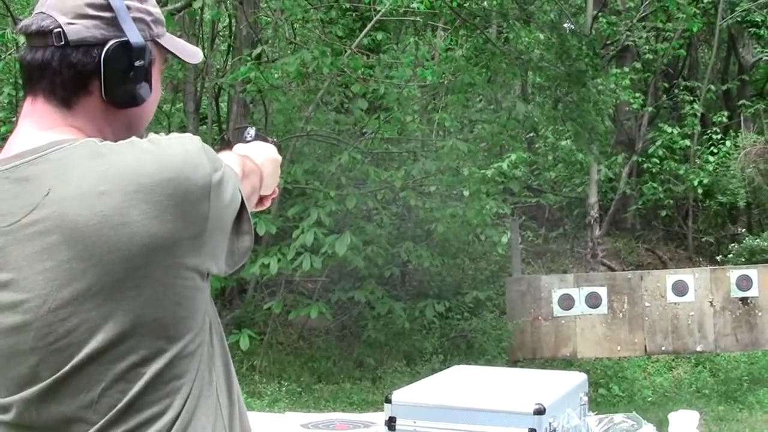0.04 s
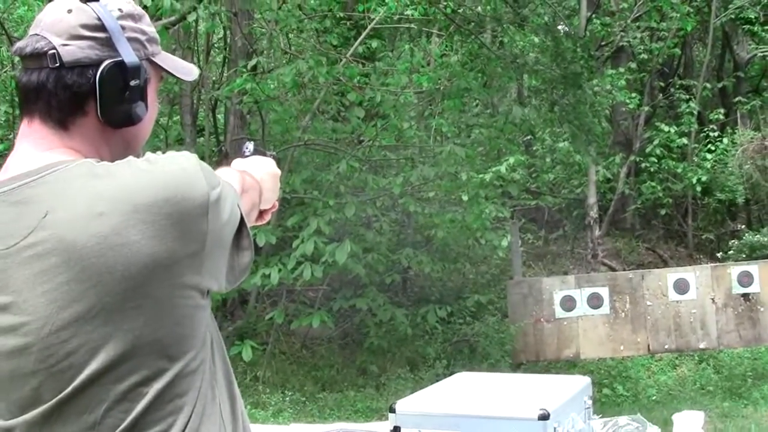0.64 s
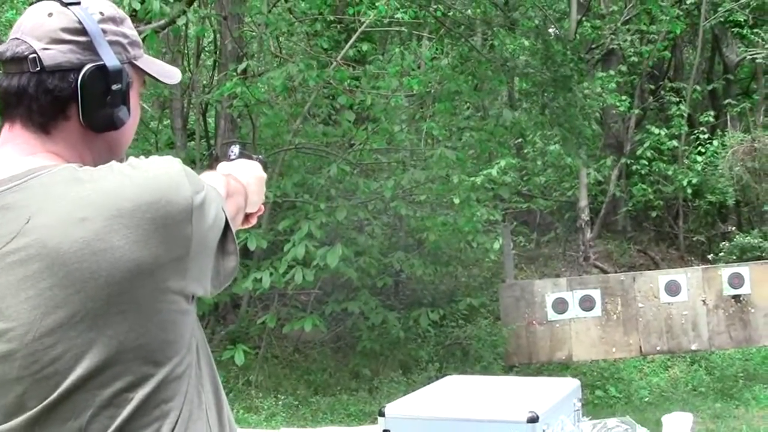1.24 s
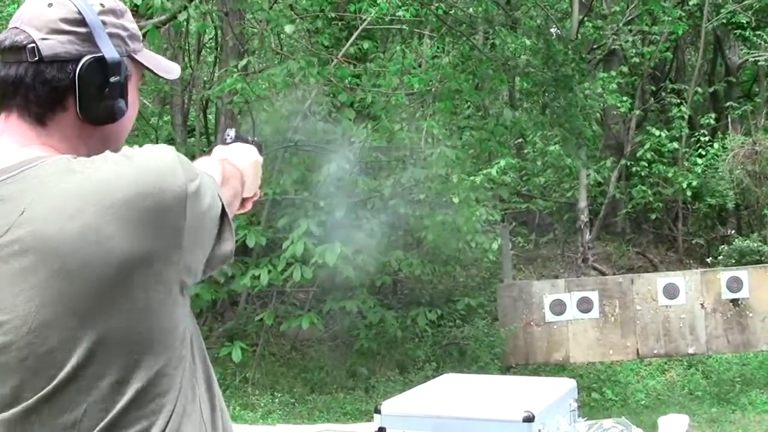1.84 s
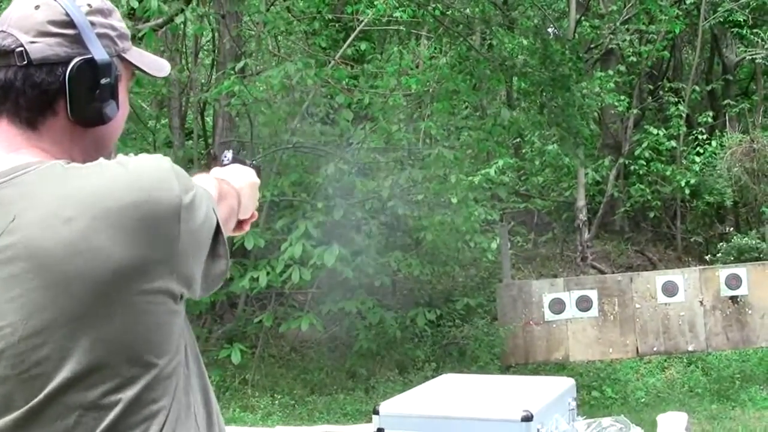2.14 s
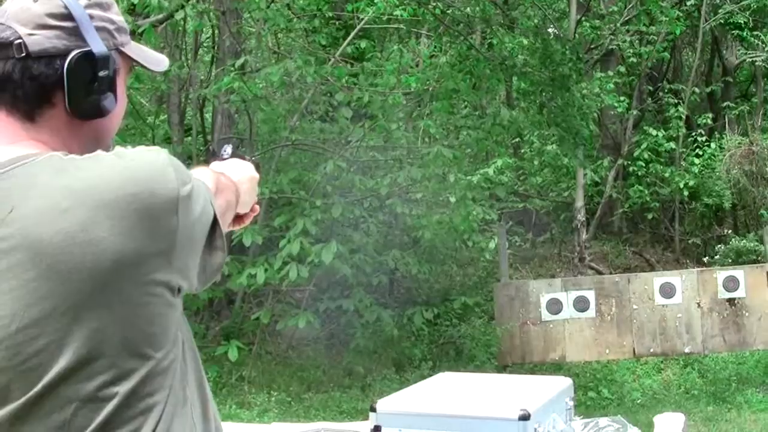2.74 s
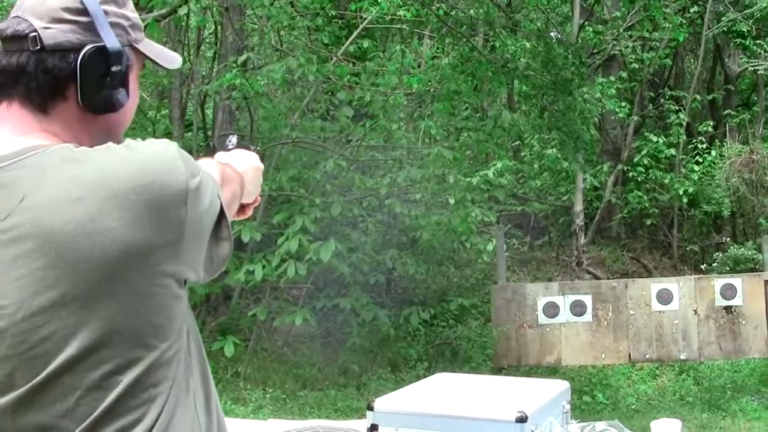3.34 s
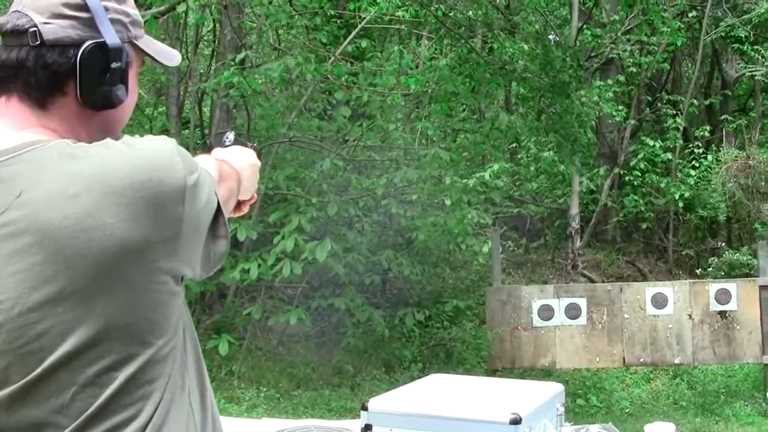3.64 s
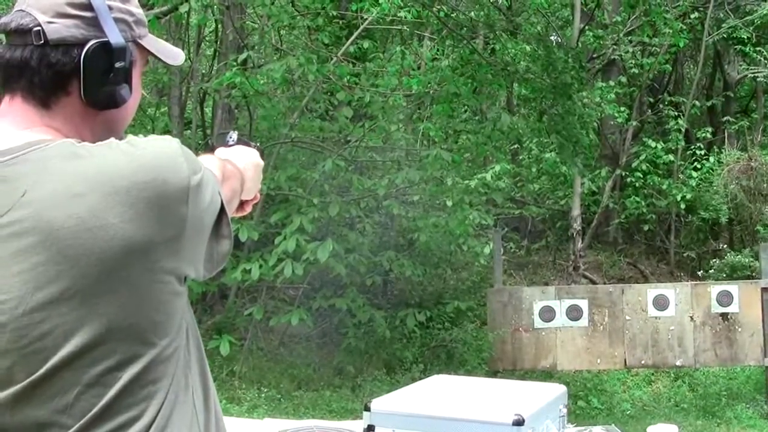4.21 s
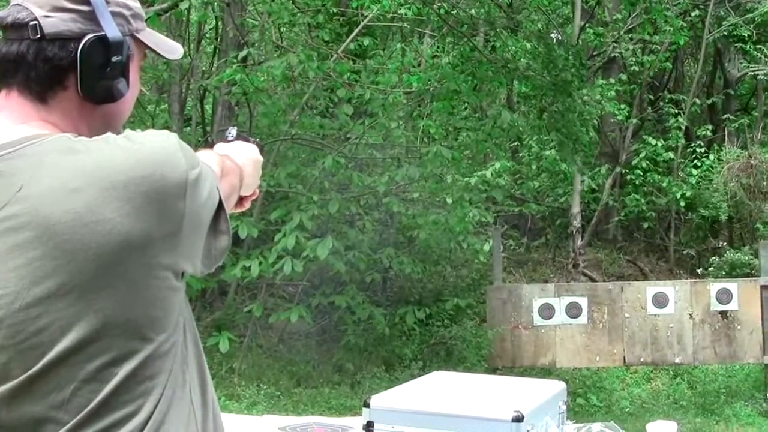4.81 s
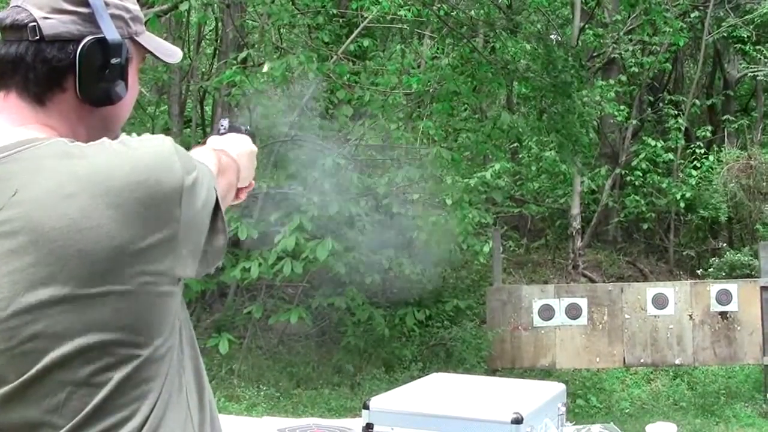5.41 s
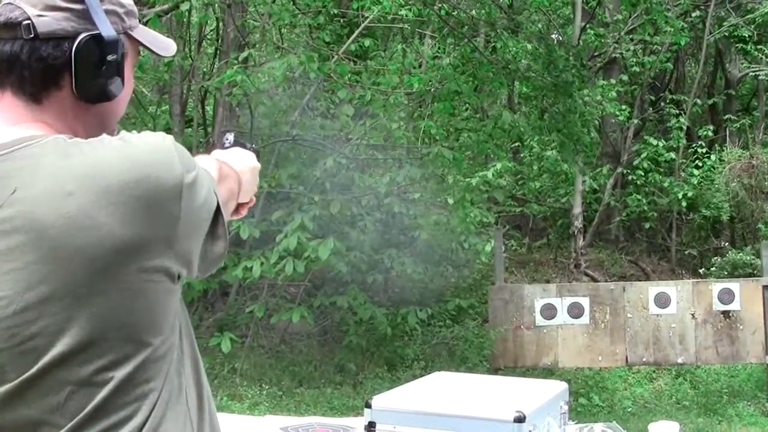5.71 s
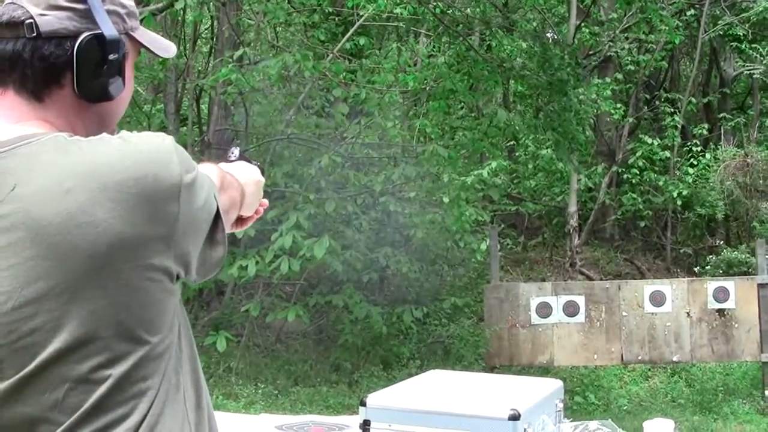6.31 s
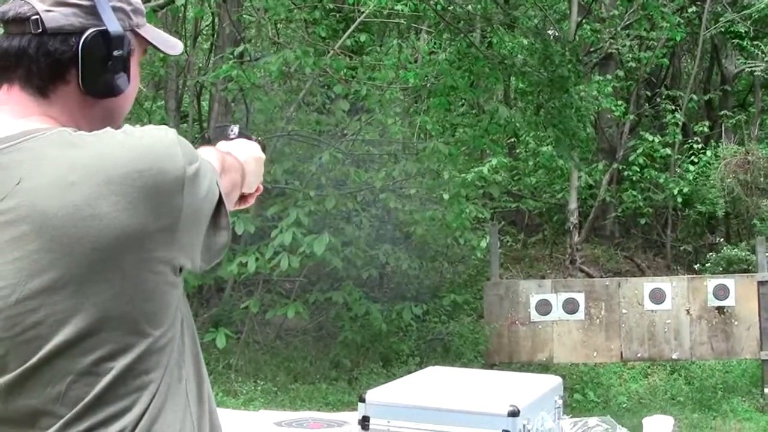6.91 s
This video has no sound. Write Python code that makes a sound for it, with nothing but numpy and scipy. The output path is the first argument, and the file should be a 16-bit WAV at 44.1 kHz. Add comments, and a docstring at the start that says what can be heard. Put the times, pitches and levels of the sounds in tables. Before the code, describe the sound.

A handgun fires twice close by, then another gun farther off, each shot trailing a long forest echo over faint birdsong.

```python
"""At a range in the woods, birds sing and a far engine drones as an earlier shot's echo dies away.
At 1.85 s a handgun fires close by: the blast overloads the microphone, rings the bench and slaps back
from the targets, then the forest returns a long roar that darkens as it travels. The gun clicks in the
hands and the engine swells. A second close shot comes at 5.47 s and a third, from another lane, just
after 6 s. Birds call again over its fading roar."""
import sys
import numpy as np
from scipy import signal
from scipy.fft import rfft, irfft
from scipy.io import wavfile
from scipy.ndimage import uniform_filter1d

SR = 44100
rng = np.random.default_rng(int(sys.argv[2]) if len(sys.argv) > 2 else 0)


def log_audio(samples):
    """Write samples as a 16-bit WAV file to the path given in sys.argv[1]."""
    # one column per channel
    frames = np.atleast_2d(samples).T
    # limit to full scale, then quantise
    limited = np.clip(frames, -1, 1)
    pcm = np.round(limited * 32767).astype(np.int16)
    wavfile.write(sys.argv[1], SR, pcm)


N = 311346
TIME = np.arange(N) / SR

# how much the two channels differ: (frequency [Hz], side compared with middle [dB])
STEREO_WIDTH = [(30, -24), (120, -36), (250, -40), (500, -26), (1000, -16.5), (2000, -12), (4000, -17),
                (12000, -40)]
# tone of the woods' hush: (frequency [Hz], relative level [dB])
AIR_COLOUR = [(18, -57), (30, -27), (64, -13), (107, -1.5), (213, -3.5), (254, 2.5), (311, -3), (544, -4.5),
              (720, -8.5), (1110, -12), (1430, -15.5), (5100, -23), (5510, -25), (10400, -33), (13100, -43)]
# the far engine's loudness, in three stretches that are joined up: (time [s], relative level [dB])
ENGINE_LEVELS = [
    [(0.1, -57.5), (1.496, -68), (1.5, -69)],
    [(2.65, -51), (3.26, -51.5), (3.36, -55), (3.99, -44), (4.22, -45.5), (4.63, -51.5), (5.3, -52),
     (5.35, -56)],
    [(6.4, -48.5), (6.56, -44), (7.0, -43.5)],
]
# tones of the engine, which fires twice a turn: (multiple of the shaft speed, relative level [dB])
ENGINE_TONES = [(2, -4.5), (3, -20.5), (5, -24.5)]

# long clear whistles:
# (time [s], length [s], start pitch [Hz], middle pitch [Hz], end pitch [Hz], level [dB], swell [dB])
BIRD_WHISTLES = [(-.02, 0.11, 4000, 4470, 4610, -49.5, -3), (0.408, 0.33, 2974, 3007, 2670, -48.5, 6),
                 (0.936, .5, 5183, 5240, 5200, -56.5, -8.5), (6.959, 0.093, 3650, 3860, 3970, -50.5, 7)]
# falling chirps, alone or in a fading run: (time [s], run length [s], pitch [Hz], level [dB])
BIRD_CHIRPS = [(.088, .05, 2960, -50.5), (.115, .05, 3420, -51.5), (.905, .58, 3840, -52),
               (3.66, .05, 3270, -63), (6.89, .05, 5080, -49)]
# warbles that swing up and down: (time [s], length [s], pitch [Hz], swing [share of pitch], level [dB])
BIRD_WARBLES = [(.742, .03, 3760, 0.091, -58), (3.46, 0.072, 3574, 0.13, -62),
                (4.561, 0.26, 3250, .17, -58), (6.747, .12, 5340, .06, -54)]
# thin high peeps: (time [s], level [dB])
BIRD_PEEPS = [(.052, -65), (.33, -67), (.5, -67), (.745, -63), (1.07, -62.5), (1.17, -66), (6.772, -60)]

# A fade time (t60) is how long a sound takes to fall by 60 dB.
# the gun shifting in the hands; short ones click, long ones rub: (time [s], level [dB], fade time [s])
GUN_CLICKS = [(2.6, -55, 0.91), (3.404, -42, 0.021), (3.415, -45.5, .06), (3.66, -57, .15),
              (3.695, -56, 0.14), (3.885, -55.5, 0.121), (6.69, -52, .15), (6.72, -50.5, 0.2)]
# tone of scraping steel: (frequency [Hz], relative level [dB])
STEEL_COLOUR = [(1500, -8), (3300, 4), (4200, -2), (4800, 2), (6000, -3), (9000, -10), (10700, -8),
                (13000, -24)]

# tone of the sound scattered by the trees: (frequency [Hz], relative level for this lane [dB],
# relative level for the other lane [dB], how fast each band of the roar fades [dB/s])
FOREST_COLOUR = [(40.15, -42.5, -40, 8.5), (110, -30, -25, 3), (199.6, -17.5, -14, 3), (324, -9, -16, 2),
                 (479.5, -1.5, -8, 1), (712, 2.5, 0.5, 2), (1060, -2, -1, 3.5), (1460, -8.5, -2, 6.5),
                 (2030, -6.5, -5, 12.5), (3200, -10, -9, 19), (4300, -11.5, -11, 27),
                 (5627, -14.5, -17, 36), (7600, -16, -19.5, 48.5), (9460, -18.5, -26, 68),
                 (11500, -24, -34.5, 92.5), (13000, -32.5, -56.5, 152)]
# the woods' answer to each lane builds, holds while the blast crosses the nearest trees, then thins:
# (full level [dB], starts lower by [dB], build time [s], held until [s], fall per doubling of time [dB])
ROAR_SHAPES = [(-12, 15, .095, 0.47, 9.5), (-15, 6.5, 0.016, 0.18, 5.5)]
THIS_LANE, OTHER_LANE = 0, 1
# echoes from the target boards, then from banks farther off:
# (delay [s], relative level [dB], fade time [s], dull above [Hz])
SLAP_ECHOES = [(0.0424, -13.5, 0.051, 1700), (0.0571, -7.5, 0.024, 4200), (.058, -18, 0.046, 241),
               (.074, -13, 0.03, 1300), (0.197, -20, 0.041, 354), (0.274, -20, 0.046, 690),
               (.36, -24.5, 0.07, 600), (0.439, -24, 0.05, 416), (.772, -26, 0.07, 263)]
# the notes the bench rings with: (pitch [Hz], relative level [dB], fade time [s])
BENCH_NOTES = [(248, 0, 0.051), (454, -1.5, 0.094), (574, -6, 0.024), (720, -4.5, .035), (995, -9, 0.058),
               (1159, 0.5, 0.045), (1394, -3, 0.066), (1510, -15, 0.064), (1830, -18, .06),
               (2260, -17.5, 0.09), (3100, -16.5, 0.05)]
# the bang from the other lane: (frequency [Hz], relative level [dB], fade time [s])
FAR_BLAST = [(40, -26.5, .1), (120, -10, 0.054), (230, 7.5, 0.068), (603, 2.5, 0.059), (1210, 1, 0.14),
             (2170, -3.5, 0.16), (4000, -12, .1), (12000, -62, .1)]
# the bang at the close gun's muzzle: (frequency [Hz], relative level [dB], fade time [s])
NEAR_BLAST = [(30, -21.5, .1), (88.9, -18, 0.027), (217, -2.5, 0.075), (701.3, -7, 0.042),
              (1473, -2.5, 0.0194), (3004, -3.5, 0.017), (5000, -6.5, .012), (9000, -4.5, 0.007),
              (13000, -12.5, .008)]
# shots beside the microphone: (time [s], gain [dB])
NEAR_SHOTS = [(1.8506, 1), (5.4707, 1)]


def gain_of(db):
    """Turns decibels into a number to multiply a sound by."""
    return 10 ** (np.asarray(db) / 20)


def evened(x):
    """Scales a sound to an average strength (rms) of one."""
    return x / np.sqrt(np.mean(x ** 2) + 1e-20)


def read(points, hz):
    """Reads between (Hz, value) points, giving every octave equal room."""
    known_hz, value = np.transpose(points)
    return np.interp(np.log(hz + 1), np.log(known_hz + 1), value)


def add(mix, s, sound):
    """Mixes a sound in at s seconds; whatever falls outside is dropped."""
    start = round(s * SR)
    part, sound = mix[..., max(start, 0):], sound[..., max(-start, 0):]
    n = min(part.shape[-1], sound.shape[-1])
    part[..., :n] += sound[..., :n]


def coloured(x, spectrum):
    """Shapes a sound's tone with a curve of (Hz, dB) points."""
    n = x.shape[-1]
    return irfft(rfft(x) * gain_of(read(spectrum, np.fft.rfftfreq(n, 1 / SR))), n)


def filtered(x, kind, hz, order=2):
    """Keeps what lies above a frequency (highpass) or between two (bandpass)."""
    return signal.sosfilt(signal.butter(order, hz, kind, fs=SR, output="sos"), x)


def stereo(mid, side):
    """Left and right sound nearly the same, with the bass in the centre."""
    side = coloured(side, STEREO_WIDTH)
    return np.array([mid + side, mid - side])


def fading(x, loss, bands=26):
    """Splits a sound into overlapping bands that each die at their own rate (Hz, dB/s)."""
    n = x.shape[-1]
    t, hz, spectrum = np.arange(n) / SR, np.fft.rfftfreq(n, 1 / SR), rfft(x)
    centres = np.geomspace(50, 14000, bands)
    shares = [read(np.c_[centres, one], hz) for one in np.eye(bands)]
    return sum(irfft(spectrum * share, n) * gain_of(-read(loss, centre) * t)
               for centre, share in zip(centres, shares))


def wobble(n, size):
    """A smooth random drift that changes over about size samples."""
    return evened(uniform_filter1d(rng.standard_normal(n), size))


def progress(length):
    """Runs from 0 to 1 in length seconds."""
    return np.linspace(0, 1, round(length * SR))


def air(level_db=-53.5, spread_db=4):
    """The steady hush of the woods, coming from all sides."""
    mid, side = evened(coloured(rng.standard_normal((2, N)), AIR_COLOUR))
    return gain_of(level_db) * stereo(mid, gain_of(spread_db) * side)


def engine(shaft_hz=58.95, waver=0.0035, boost_db=1.0):
    """A far engine hums at multiples of its shaft speed, swelling and fading."""
    turns = np.cumsum(shaft_hz * (1 + waver * wobble(N, size=9000))) / SR
    hum = sum(gain_of(db) * np.sin(2 * np.pi * round(k) * turns) for k, db in ENGINE_TONES)
    level_db = boost_db + np.interp(TIME, *np.vstack(ENGINE_LEVELS).T)
    return gain_of(level_db) * evened(hum)


def bird_note(hz, waver, swell_db=0, flutter_db=2):
    """A pure tone wavers and flutters as it follows a pitch curve."""
    n = len(hz)
    level_db = flutter_db * wobble(n, size=500) + swell_db * np.linspace(0, 1, n)
    loudness = evened(gain_of(level_db) * signal.windows.tukey(n, .3))
    pitch = hz * (1 + waver * wobble(n, size=120))
    return loudness * np.sin(2 * np.pi * np.cumsum(pitch) / SR)


def bird_calls(chirp_every_s=0.11, chirp_fade_db_per_s=15, warbles_per_s=15, peep_hz=8230, peep_s=0.03):
    """Gives each call as (time [s], level [dB], share coming straight through the leaves, sound)."""
    for s, length, *pitches, db, swell_db in BIRD_WHISTLES:
        arch = np.polyval(np.polyfit([0, .5, 1], pitches, 2), progress(length))
        yield s, db, 0.55, bird_note(arch, waver=.005, swell_db=swell_db)
    for s, run_s, hz, db in BIRD_CHIRPS:
        fall = hz * (1 + 0.15 * (1 - 2 * progress(length=0.041)))  # from 15% above to 15% below
        for later in np.arange(0, run_s, chirp_every_s):
            yield s + later, db - chirp_fade_db_per_s * later, .4, bird_note(fall, waver=.02)
    for s, length, hz, swing, db in BIRD_WARBLES:
        uneven_rate = warbles_per_s * (1 + 0.41 * wobble(round(length * SR), size=1500))
        turns = np.cumsum(uneven_rate) / SR
        yield s, db, 0.29, bird_note(hz * (1 - swing * np.cos(2 * np.pi * turns)), waver=.02)
    for s, db in BIRD_PEEPS:
        yield s, db, .8, bird_note(np.full(round(peep_s * SR), peep_hz), waver=0.0097)


def birds(t60=0.78, build_s=.025):
    """The deeper in the woods the birds sit, the more the trees smear their calls."""
    direct, scattered = np.zeros((2, N))
    for s, db, share, sound in bird_calls():
        add(direct, s, gain_of(db) * np.sqrt(share) * sound)
        add(scattered, s, gain_of(db) * np.sqrt(1 - share) * sound)
    t = TIME[:SR]
    trees = rng.standard_normal((2, SR)) * gain_of(-60 * t / t60) * (1 - np.exp(-t / build_s))
    mid, side = signal.fftconvolve(scattered[None], trees / np.linalg.norm(trees[0]), axes=1)[:, :N]
    return stereo(direct + mid, 2 * side)


def handling():
    """Steel clicks and rubs lightly as the gun shifts in the hands."""
    out, t = np.zeros(N), TIME[:SR // 2]
    for s, db, t60 in GUN_CLICKS:
        scrape = evened(coloured(rng.standard_normal(len(t)), STEEL_COLOUR))
        rise = 1 - np.exp(-t / (0.0203 * t60))
        add(out, s, gain_of(db - 60 * t / t60) * scrape * rise)
    return out


def forest_roar(lane, echoes_per_s=5000, sky_loss_db_per_s=3, flutter_db=0.5, size=180224):
    """Countless echoes from trunks and leaves; the later they come, the more treble they have lost."""
    forest, t = np.array(FOREST_COLOUR), np.arange(size) / SR
    colour, fade_rates = forest[:, [0, 1 + lane]], forest[:, [0, -1]]
    full_db, thin_db, build_s, hold_s, fall_db = ROAR_SHAPES[lane]
    late = np.maximum(t, hold_s)
    level_db = full_db - thin_db * np.exp(-t / build_s)
    level_db -= fall_db * np.log2(late / hold_s) + sky_loss_db_per_s * (late - hold_s)
    echoes = rng.choice([-1, 1], (2, size)) * (rng.random((2, size)) < echoes_per_s / SR)
    strength_db = np.minimum(rng.exponential(1, (2, size)), 4.5)
    clumps_db = flutter_db * wobble(size, size=600)  # trees stand in groups
    mid, side = evened(coloured(echoes * gain_of(strength_db + clumps_db), colour))
    return fading(stereo(mid, side), fade_rates) * gain_of(level_db)


def slap_echoes(low_hz=130, size=11000):
    """Targets and banks throw the blast back; the far echoes return as dull thumps."""
    out, t = np.zeros(SR + size), TIME[:size]
    for delay, db, t60, dull_hz in SLAP_ECHOES:
        decay = gain_of(-60 * t / t60)
        band_hz = [low_hz, max(dull_hz, 1.3 * low_hz)]
        echo = evened(filtered(rng.standard_normal(size) * decay, "bandpass", band_hz))
        add(out, delay, gain_of(db) * echo * np.sqrt(np.mean(decay ** 2)))
    return out


def burst(table, size=8192):
    """A sudden puff of noise with its own level and fade time in each band."""
    hz, db, t60 = np.transpose(table)
    phases = 2 * np.pi * rng.random((size // 256, 129))
    flat_noise = irfft(np.exp(1j * phases)).ravel()  # short blocks, even across all frequencies
    return fading(evened(coloured(flat_noise, np.c_[hz, db])), np.c_[hz, 60 / t60])


def far_shot():
    """Heard from the side and farther off, the other lane's bang has no sharp edge or deep bass."""
    return filtered(stereo(burst(FAR_BLAST), burst(FAR_BLAST)), "bandpass", [130, 6000], order=3)


def near_shot(lead_s, blast_db=12, spread_db=-13, push_db=-17, push_s=.0015, fizz_db=-23, size=8192):
    """A faint fizz as the gun goes off, then the blast, its push of air and the ringing bench."""
    t = TIME[:size]
    side = gain_of(spread_db) * filtered(burst(NEAR_BLAST), "highpass", 1100)
    bang = gain_of(blast_db) * (burst(NEAR_BLAST) + np.array([side, -side]))
    bang = filtered(bang, "highpass", 260)  # a short barrel gives little bass
    bench = sum(gain_of(db - 60 * t / t60) * np.sin(2 * np.pi * hz * t) for hz, db, t60 in BENCH_NOTES)
    add(bang, .0045, bench / abs(bench).max())
    push = (1 - t / push_s) * np.exp(-t / push_s)  # the air pushes out, then sucks back
    add(bang, .004, gain_of(push_db) * push)
    hiss = evened(coloured(rng.standard_normal((2, size)), [(500, 1.0), (5000, -2.5), (12000, -9)]))
    lead = round(lead_s * SR)
    fizz = gain_of(fizz_db) * hiss[:, :lead] * np.linspace(.2, 1, lead)
    return np.hstack([fizz, bang])


def gunfire(lead_s=.0036, far_s=6.085, far_db=-7.5, earlier_s=-2.15, earlier_db=-0.5):
    """Shots from one spot share one blast shape; the woods answer every shot."""
    out = np.zeros((2, N))
    blast, echoes = near_shot(lead_s), slap_echoes()
    for s, db in NEAR_SHOTS:
        add(out, s - lead_s, gain_of(db) * blast)
        add(out, s, gain_of(db) * echoes)
        add(out, s, gain_of(db) * forest_roar(THIS_LANE))
    add(out, far_s, gain_of(far_db) * far_shot())
    add(out, far_s, forest_roar(OTHER_LANE))
    add(out, earlier_s, gain_of(earlier_db) * forest_roar(THIS_LANE))  # only its tail is heard
    return out


def scene():
    """Gunfire over the quiet range."""
    return gunfire() + birds() + handling() + engine() + air()


def record(dry, low_hz=45, top_hz=13400):
    """The microphone overloads, flattening the peaks; the deepest bass and highest treble are cut."""
    clipped = dry / (1 + dry ** 14) ** (1 / 14)
    trimmed = filtered(clipped, "highpass", low_hz, order=1)
    treble_cut = signal.firwin(255, top_hz, window=("kaiser", 8), fs=SR)
    return signal.oaconvolve(trimmed, treble_cut[None], "same")


dry = scene()
out = record(dry)
log_audio(out)
```